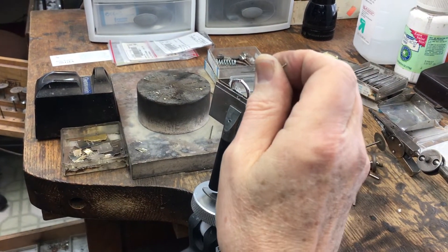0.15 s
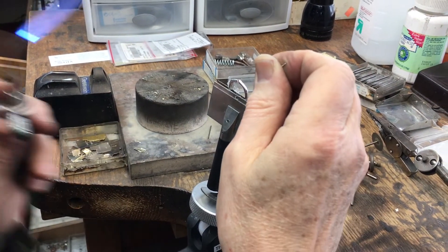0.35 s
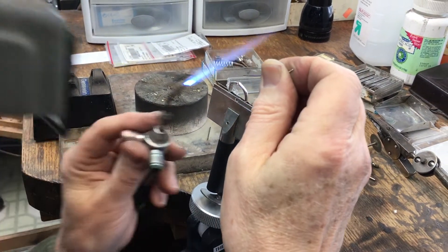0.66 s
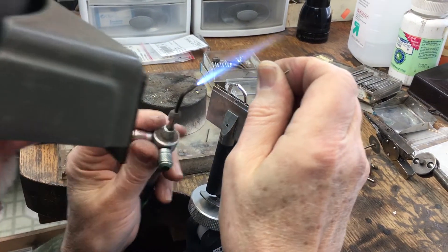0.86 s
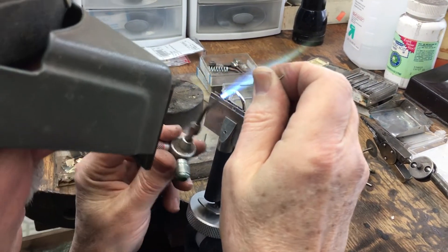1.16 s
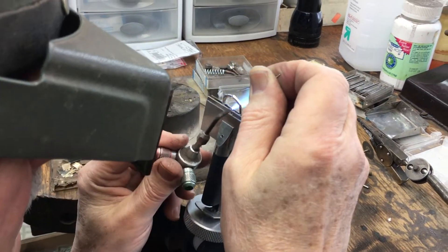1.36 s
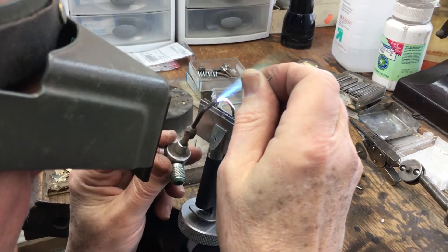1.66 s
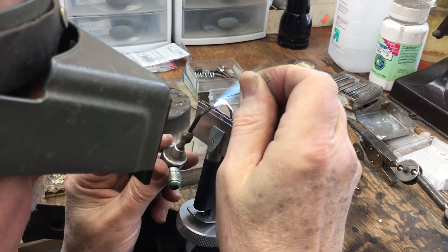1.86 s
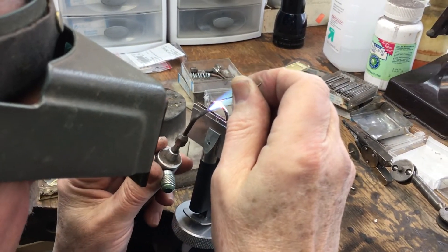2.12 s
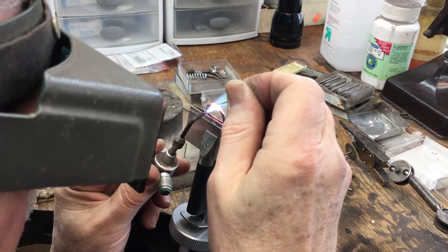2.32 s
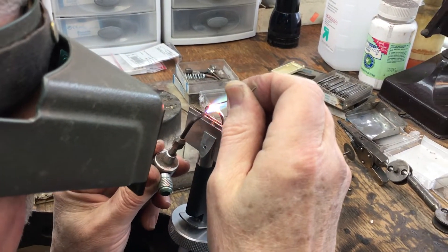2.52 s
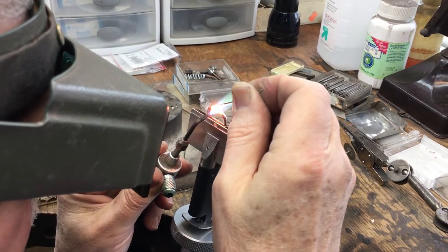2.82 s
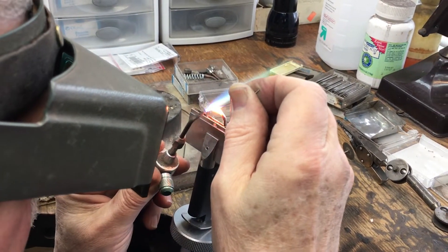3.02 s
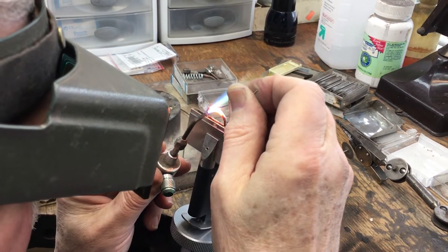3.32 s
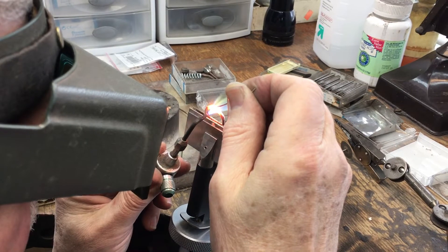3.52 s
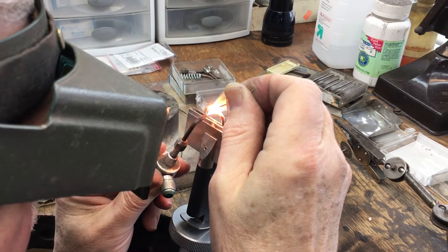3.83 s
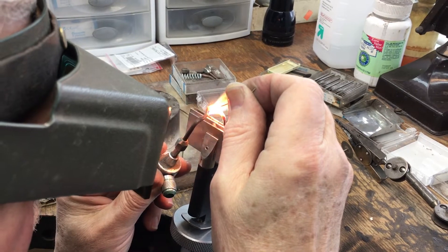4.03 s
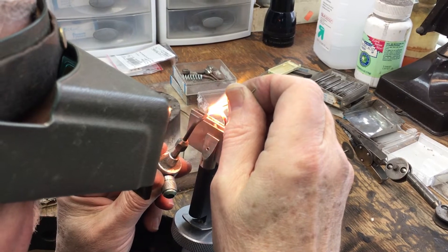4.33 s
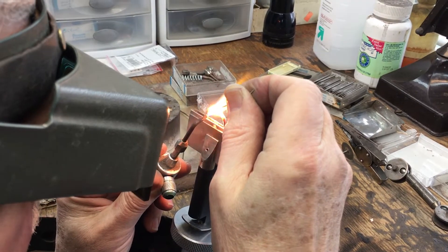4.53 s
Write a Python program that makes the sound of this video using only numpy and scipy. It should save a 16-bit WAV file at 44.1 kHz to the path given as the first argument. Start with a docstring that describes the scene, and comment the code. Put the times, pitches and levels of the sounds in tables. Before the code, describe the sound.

A small gas torch burns for about 4.7 seconds at a jeweller's bench, heard by one close microphone, the same in both channels. Dense, bright jet hiss dominates throughout, strongest around 4 to 10 kHz, with little bass. It starts steady, rises about 5 decibels near 0.65 seconds as the torch swings in, stays strong to about 0.9, then eases down by 1.3 and holds nearly level. Short reflections from bench, hands and visor give a fine hollow comb, sweeping quickly during the swing and then drifting gently with small nozzle movements. Very quiet low workshop rumble lies underneath. A faint, lumpy low-mid flame roar gradually grows until about 3 seconds, then stays. Soft, dull pops punctuate the hiss from about 2.2 seconds: a cluster around 2.7 to 2.9, the strongest near 2.74, then scattered ones around 3.2, 3.4, 3.9, 4.1 and 4.5. The hiss continues to the end.

```python
"""A small gas torch hisses at a jeweller's bench, swung in and then held on a piece of metal.
The hiss is jet noise; echoes off nearby things (bench, tools, hands, visor) interfere with it,
giving a fine comb that slides as the nozzle moves. Under it lies the rumble of the workshop air.
The flame roars, as lumpy low noise, and pops softly, as brief pressure pulses. One microphone."""
import sys
import numpy as np
from scipy import signal
from scipy.fft import rfft, irfft
from scipy.io import wavfile
from scipy.ndimage import uniform_filter1d

SR = 44100
rng = np.random.default_rng(int(sys.argv[2]) if len(sys.argv) > 2 else 0)


def boost_factor(decibels):
    """Convert a level in decibels to a linear amplitude factor."""
    exponent = np.asarray(decibels, float) / 20
    return 10 ** exponent


def transcribe(u):
    """Save the signal u as a 16-bit wav file named by the first command-line argument.

    u: samples, shape (n,) or (channels, n), limited to [-1, 1]; the rate is SR.
    q: integer samples, one column per channel.
    """
    v = np.clip(np.atleast_2d(u).T, -1, 1)
    q = np.round(v * 32767).astype(np.int16)
    wavfile.write(sys.argv[1], SR, q)


N = 206167

# Hiss at the microphone as the jet turns: (time [s], level [dB], tilt about 7 kHz [dB per octave])
HISS_LEVEL = [(0.0, -27, 2), (0.13, -28, 1.5), (0.65, -23, 1.5), (0.69, -25.5, 0.5), (0.87, -24, 1.5),
              (1.31, -27, 0.0), (1.95, -26, 0.0), (3.69, -27, -0.5), (4.67, -26, 0.0)]
# Spectrum of the gas jet as heard: (frequency [Hz], relative density [dB per Hz])
JET_SPECTRUM = [(300, -52), (950, -20.5), (1500, -15), (2200, -15.5), (3000, -10), (4000, -6.5),
                (5000, -6.5), (6200, 0.0), (7500, -3.5), (9000, -0.7), (10500, -7), (12000, -6),
                (14000, -4), (15800, -6.5)]
# Nozzle offset from its resting place: (time [s], along [mm], across [mm])
NOZZLE_PATH = [(1.27, 6.5, -4.3), (1.42, 2.6, -4.7), (1.6, 2.6, -3.3), (1.85, 3.1, -1.6), (2.17, 2.9, -0.9),
               (2.53, 0.0, 0.0), (2.82, 1.3, 1.7), (3.05, 3.4, 3.2), (3.25, 6.5, 4.4), (3.48, 2.4, 3.4),
               (3.75, 1.4, 3.0), (4.05, 2.7, 3.5), (4.32, 3.5, 4.1), (4.56, 4.3, 3.7)]
# Near echoes at rest: (delay after the direct sound [ms], strength [ratio to direct],
# extra path per nozzle offset along [mm per mm], the same across [mm per mm])
NEAR_ECHOES = [(0.291, -0.15, -0.12, -0.6), (0.424, 0.16, 0.36, 0.49), (0.55, -0.098, -0.14, 0.8),
               (0.63, 0.15, -0.064, 1), (0.789, -0.12, -0.14, -0.7), (0.81, 0.12, -0.42, 0.5),
               (1.0, -0.074, 0.74, -0.3), (1.26, -0.13, -0.19, 1), (1.318, 0.059, -0.46, -1.3),
               (1.349, -0.19, -0.0096, 2.2), (1.42, -0.029, 1.0, 1.5), (1.459, -0.17, -0.59, 2),
               (1.702, 0.057, -0.066, -0.5), (1.735, 0.073, 0.77, 3.2), (2.123, 0.11, 1.3, 0.9),
               (2.205, 0.071, 0.32, -1.5), (2.395, 0.2, -1, 1), (2.448, 0.17, 0.2, 3.5),
               (2.55, 0.11, 0.12, 1.1), (2.6, 0.075, -0.33, 1.7), (2.642, -0.068, 0.7, -1.8),
               (2.705, 0.048, 0.092, -1.5), (2.854, 0.11, 1.1, -1.9), (2.896, 0.14, 1.2, 1.3),
               (3.022, -0.032, 0.1, -0.8), (3.124, 0.15, 1.7, 0.9), (3.247, 0.19, 0.077, -2),
               (3.903, -0.092, 0.66, 1.8), (4.414, 0.16, -1.1, -0.7), (4.54, 0.062, 1, 2),
               (5.272, 0.13, 1.7, 0.8)]
# Swing of the torch towards its work: (time [s], distance still to travel [mm])
SWING_IN = [(.15, 95), (.62, 40), (.75, 25), (1.05, 15), (1.3, 0)]
# Bright and hollow bands gliding through the hiss:
# (start [s], end [s], first centre [Hz], last centre [Hz], greatest lift [dB])
GLIDING_BANDS = [(-.2, .35, 4950, 4800, -3), (.62, 1.02, 5500, 6400, 3), (.5, .72, 5300, 7300, -6),
                 (.5, .95, 8500, 9000, 2.5), (.72, .9, 5200, 5250, -4), (.25, .8, 2200, 2350, 4),
                 (.9, 1.7, 2450, 2500, 3), (-.2, .5, 2650, 2750, -5)]
# Echoes off things the torch passes:
# (start [s], end [s], first delay [ms], last delay [ms], greatest strength [ratio to direct])
PASSING_ECHOES = [(-.25, .88, .099, .091, .12), (-.02, .63, .963, .835, .08), (.03, .58, .209, .23, -.15),
                  (.08, .42, .394, .319, -.17), (.18, .78, .367, .03, .17), (.23, 1.39, .686, .516, -.11),
                  (.26, 1.2, .723, .717, .07), (.3, .84, .28, .293, -.14), (.6, 1.38, .929, .876, .11),
                  (.6, 1.4, 2.566, 2.514, -.11), (.61, 1.4, .173, .173, .1), (.72, 1.31, .116, .071, .2),
                  (.89, 1.34, .986, .985, .14), (.97, 1.26, .31, .291, -.17)]
# Workshop air: (frequency [Hz], relative density [dB per Hz])
RUMBLE_SPECTRUM = [(12, -64), (20, -39), (43, -11), (68, -1.5), (91, -9), (125, -1), (144, -3.5),
                   (159, -6.5), (240, -10.5), (281, -9), (900, -32), (1170, -57), (1980, -120)]
# Flame roar before its lumps: (time [s], level [dB])
ROAR_LEVEL = [(0, -69), (.35, -59), (.9, -57.5), (1.4, -56.5), (2, -54), (2.6, -53), (3.2, -52.5),
              (3.8, -54), (4.67, -52)]
# Flame roar: (frequency [Hz], relative density [dB per Hz])
ROAR_SPECTRUM = [(80, -22), (200, 3), (350, 1.5), (700, 1), (1200, -1), (2000, -12), (3500, -63)]
# Loud flame pops: (time of the pulse centre [s], peak level [dB], pulse frequency [Hz])
LOUD_POPS = [(2.174, -46, 600), (2.679, -37, 700), (2.744, -30, 1400), (2.797, -38.5, 330),
             (2.871, -34, 1300), (3.157, -37, 1400), (3.265, -46, 600), (3.426, -38, 1300),
             (3.726, -49, 900), (3.886, -36.5, 800), (4.102, -35, 1200), (4.533, -40, 600)]

EDGE_HZ = 15760  # upper limit of the sound
SOUND_MM_PER_MS = 343  # speed of sound


def evened(x):
    """Normalisation: scales a signal to rms 1."""
    return x / np.sqrt(np.mean(x ** 2) + 1e-20)


def read_spectrum(points, hz):
    """Interpolation of a spectrum along a logarithmic frequency axis."""
    f, value = np.transpose(points)
    return np.interp(np.log(hz + 1), np.log(f + 1), value)


def follow(rows, t):
    """Linear interpolation of each column of a curve table at times t."""
    s, *columns = np.transpose(rows)
    return [np.interp(t, s, column) for column in columns]


def slide(row, t):
    """Linear motion from first to last while the strength fades in, holds and fades out."""
    start, end, first, last, strength = row
    fade_share = 0.16  # of the whole duration, at each end
    progress = np.clip((t - start) / (end - start), 0, 1)
    fade = np.clip(np.minimum(progress, 1 - progress) / fade_share, 0, 1)
    return first + (last - first) * progress, strength * fade


def flicker(hz):
    """Slow random fluctuation: white noise low-passed at hz, with rms 1."""
    b, a = signal.butter(2, hz, fs=SR)
    return evened(signal.lfilter(b, a, rng.standard_normal(N)))


def coloured_noise(points):
    """Stationary noise: a white spectrum weighted by the given density, with rms 1."""
    gain = boost_factor(read_spectrum(points, np.fft.rfftfreq(N, 1 / SR)))
    return evened(irfft(rfft(rng.standard_normal(N)) * gain, N))


def far_echoes(count=60):
    """Diffuse reflection: a crowd of later echoes whose strength decays exponentially with delay."""
    level_db, t60_s = -11, 0.093  # energy of the whole crowd at rest, relative to direct; decay time
    largest_lean = 1.17  # extra path per nozzle offset [mm per mm]
    draw = rng.standard_normal((count, 3))
    delay_ms = np.geomspace(2.5, 30, count) * (1 + 0.0276 * draw[:, 0])
    strength = np.sign(draw[:, 2]) * boost_factor(-60 * delay_ms / 1000 / t60_s)
    strength *= boost_factor(level_db) / np.linalg.norm(strength)
    lean = largest_lean * np.tanh(draw[:, 1])
    return zip(delay_ms, strength, lean)


def echo_comb(hz, t):
    """Interference: the direct sound plus echoes whose delays follow the nozzle form a moving comb."""
    along_mm, across_mm = follow(NOZZLE_PATH, t)
    to_go_mm, = follow(SWING_IN, t)
    along_mm = along_mm + to_go_mm
    # the resting echoes form as the torch arrives; until then the far ones are stronger
    settle_from_s, settle_for_s, swing_far_db = 0.99, 0.24, 5.5
    settled = np.clip((t - settle_from_s) / settle_for_s, 0, 1)
    far_lift = boost_factor(swing_far_db * (1 - settled))

    echoes = [slide(row, t) for row in PASSING_ECHOES]
    for ms, strength, per_along, per_across in NEAR_ECHOES:
        extra_mm = per_along * along_mm + per_across * across_mm
        echoes.append((ms + extra_mm / SOUND_MM_PER_MS, strength * settled))
    for ms, strength, lean in far_echoes():
        echoes.append((ms + lean * along_mm / SOUND_MM_PER_MS, strength * far_lift))

    total = np.ones((len(hz), len(t)), np.complex64)  # the direct sound
    for delay_ms, strength in echoes:
        phase = (2 * np.pi * np.outer(hz, delay_ms / 1000)).astype(np.float32)
        total += strength.astype(np.float32) * (np.cos(phase) - 1j * np.sin(phase))
    return total


def hiss():
    """Turbulent jet noise: unsteady broadband noise, filtered by the sum of all its paths."""
    unsteady_db = 0.19 * flicker(22) + 0.28 * flicker(60)
    jet = rng.standard_normal(N) * boost_factor(unsteady_db)
    hz, t, frames = signal.stft(jet, SR, nperseg=2048, noverlap=1536)

    # random patches, smooth over 90 frequency bins and 5 frames
    patches = uniform_filter1d(rng.standard_normal(frames.shape), 90, axis=0)
    patches_db = 0.63 * evened(uniform_filter1d(patches, 5, axis=1))

    level_db, tilt_db = follow(HISS_LEVEL, t)
    octaves = np.log2((hz + 1) / 7000)
    colour_db = read_spectrum(JET_SPECTRUM, hz)[:, None] + np.outer(octaves, tilt_db)
    band_width = 0.05  # share of the centre frequency
    for row in GLIDING_BANDS:
        centre_hz, lift_db = slide(row, t)
        distance = (hz[:, None] / centre_hz - 1) / band_width
        colour_db += lift_db * np.exp(-distance ** 2)

    shape = boost_factor(colour_db) * echo_comb(hz, t) * (hz < EDGE_HZ)[:, None]
    # each frame is set to the tabled level, whatever its comb
    shape *= boost_factor(level_db) / np.sqrt(np.mean(abs(shape) ** 2, axis=0))
    heard = frames * shape * boost_factor(patches_db)
    return signal.istft(heard, SR, nperseg=2048, noverlap=1536)[1][:N]


def rumble():
    """Low-frequency air noise of the workshop: coloured noise with slow lumps in level."""
    level_db = -59 + 0.6 * flicker(3)
    return coloured_noise(RUMBLE_SPECTRUM) * boost_factor(level_db)


def roar():
    """Combustion noise: low coloured noise, lumpy in level, that grows as the flame meets the metal."""
    level_db, = follow(ROAR_LEVEL, np.arange(N) / SR)
    lumps_db = 0.55 * flicker(3.1) + 1.9 * flicker(65)
    return coloured_noise(ROAR_SPECTRUM) * boost_factor(level_db + lumps_db)


def pop(hz):
    """Ignition of a gas pocket: a quick push and pull of pressure with no lasting excess, peak 1."""
    turns = np.arange(800) / SR * hz - 1  # periods from the pulse centre
    pressure = -turns * np.exp(-(turns / 0.28) ** 2)
    return pressure / abs(pressure).max()


def pops():
    """Impulsive combustion: loud pops at set moments, and random small ones as strong as the roar."""
    out = np.zeros(N + 800)
    for s, peak_db, hz in LOUD_POPS:
        start = round((s - 1 / hz) * SR)
        out[start:start + 800] += boost_factor(peak_db) * pop(hz)

    small_per_s, least_db = 30, -51.5  # least peak of a small pop, at the roar's loudest
    roar_db, = follow(ROAR_LEVEL, np.arange(N) / SR)
    spread_db = 3.5 * np.minimum(rng.exponential(1, N), 2.5)
    size = boost_factor(least_db + roar_db - roar_db.max() + spread_db)
    # a draw below 1 starts a pop; its third of that range picks the frequency
    chance = rng.random(N) * SR / small_per_s
    for k, hz in enumerate((600, 1000, 1500)):
        starts = size * (chance // (1 / 3) == k)
        out[:N] += signal.oaconvolve(starts, pop(hz))[:N]
    return out[:N]


def scene():
    """Superposition: all sources add at one microphone, given alike to two channels."""
    mix = hiss() + rumble() + roar() + pops()
    return np.tile(mix, (2, 1))


def top_cut(x):
    """Nothing passes above the cut-off."""
    return signal.sosfilt(signal.butter(12, 16860, fs=SR, output="sos"), x)


def record(dry):
    """Band limitation: a steep linear-phase low-pass filter removes what lies above the upper limit."""
    low_pass = signal.firwin(4095, EDGE_HZ, window=("kaiser", 9), fs=SR)
    finished = signal.oaconvolve(dry, low_pass[None], "same")
    return top_cut(finished)


dry = scene()
out = record(dry)
transcribe(out)
```